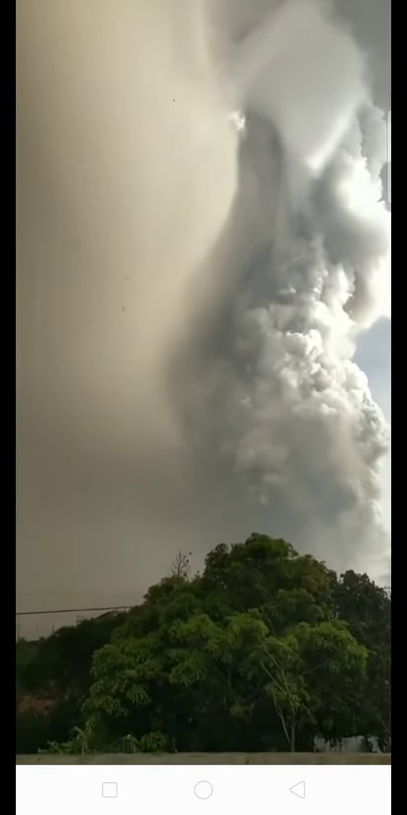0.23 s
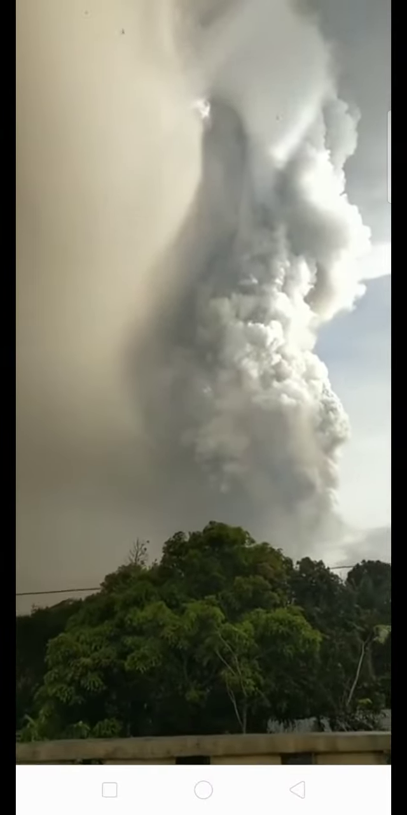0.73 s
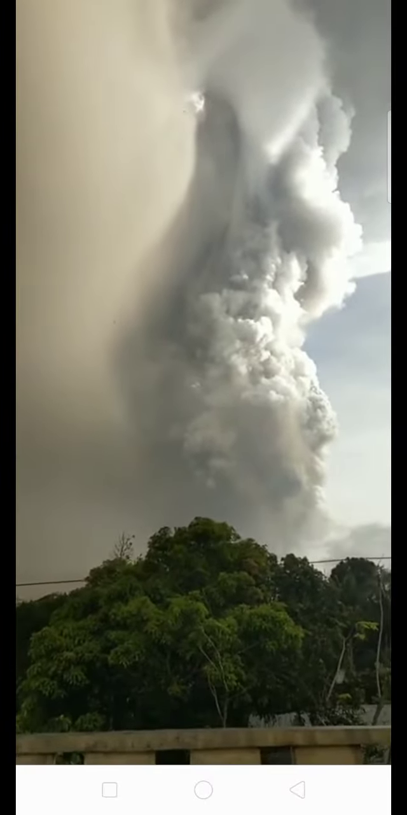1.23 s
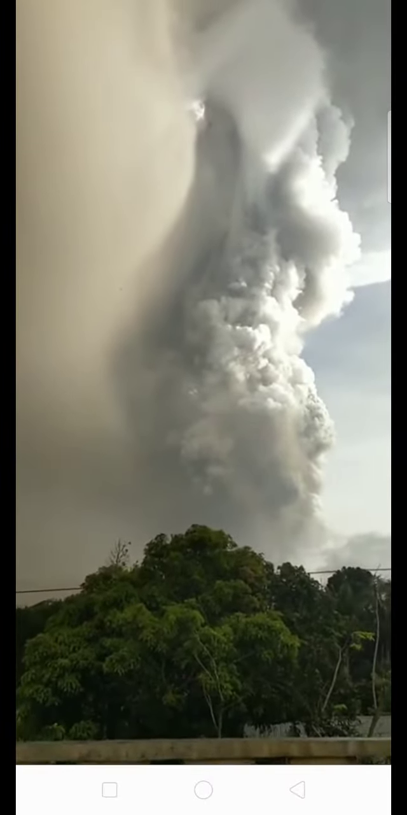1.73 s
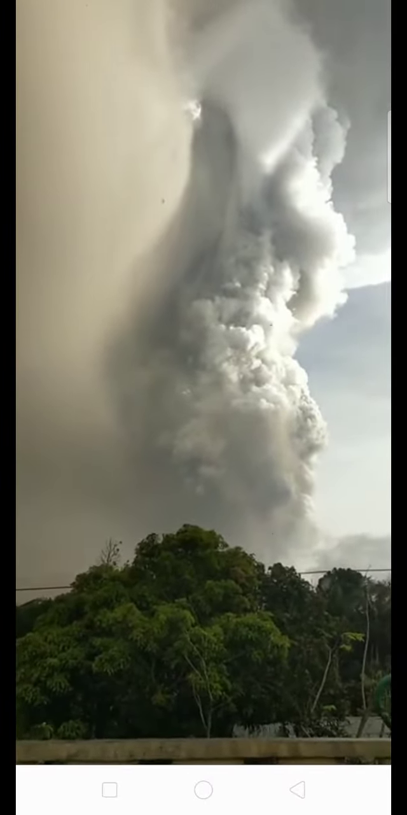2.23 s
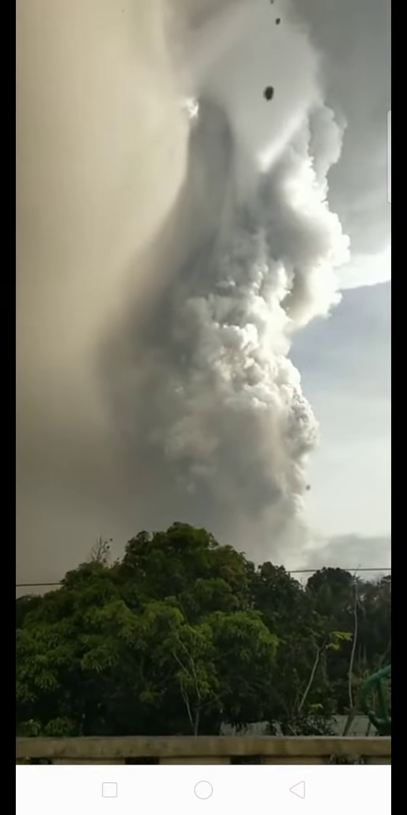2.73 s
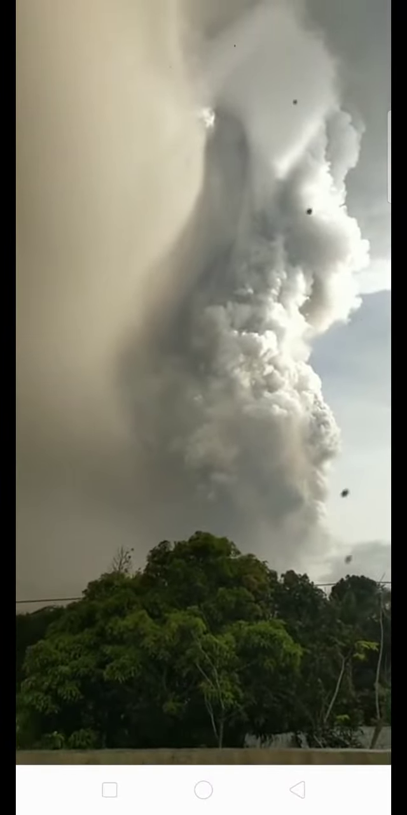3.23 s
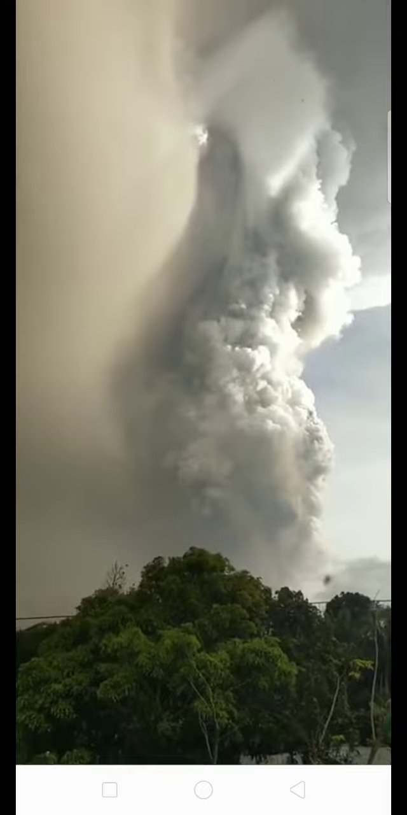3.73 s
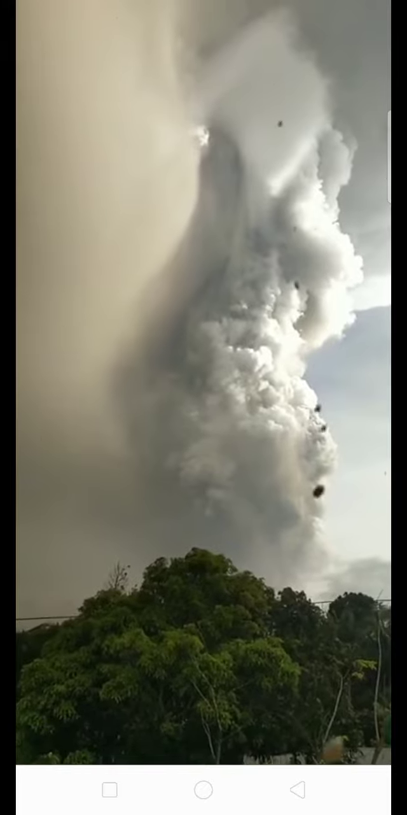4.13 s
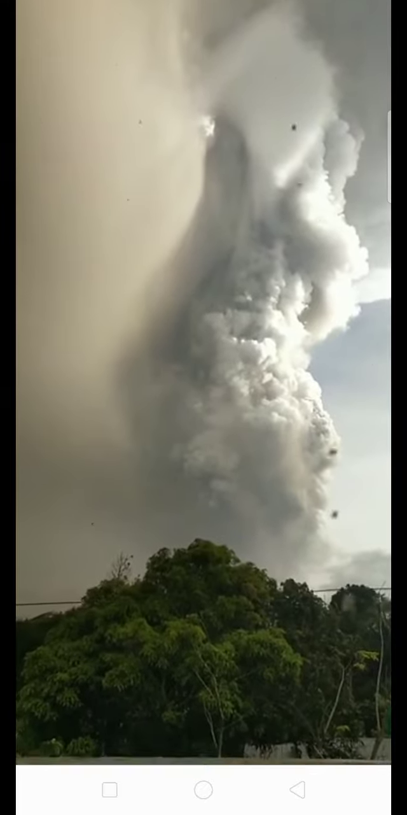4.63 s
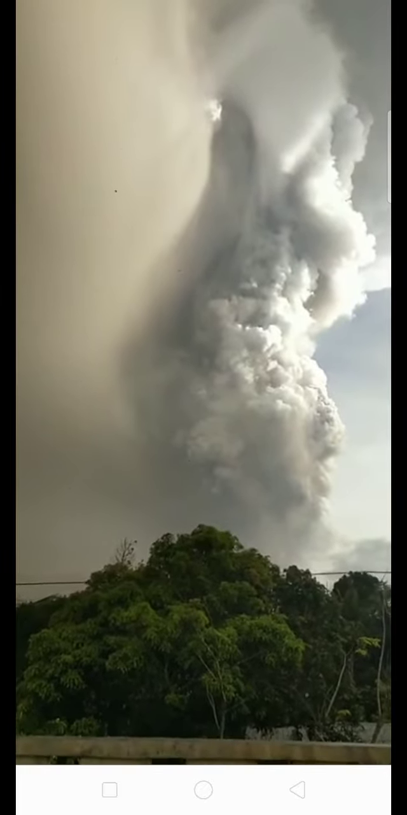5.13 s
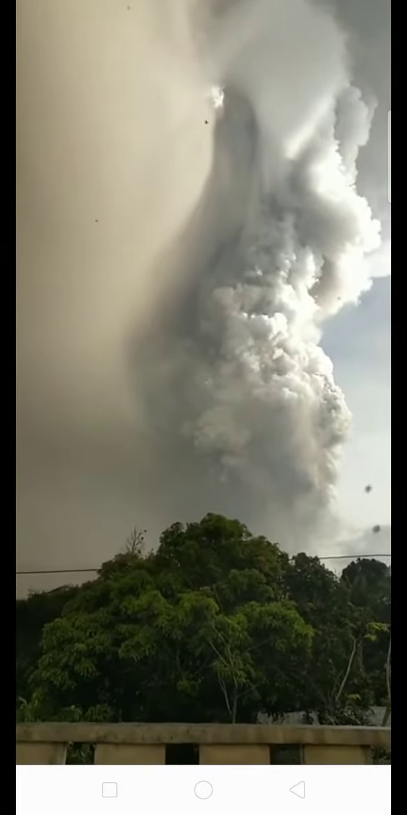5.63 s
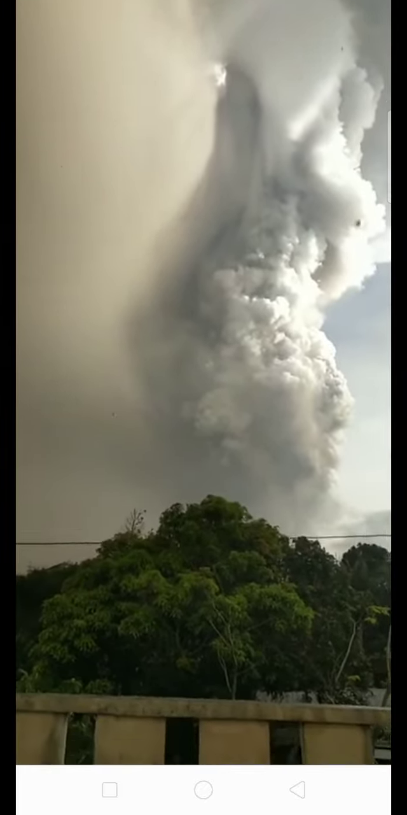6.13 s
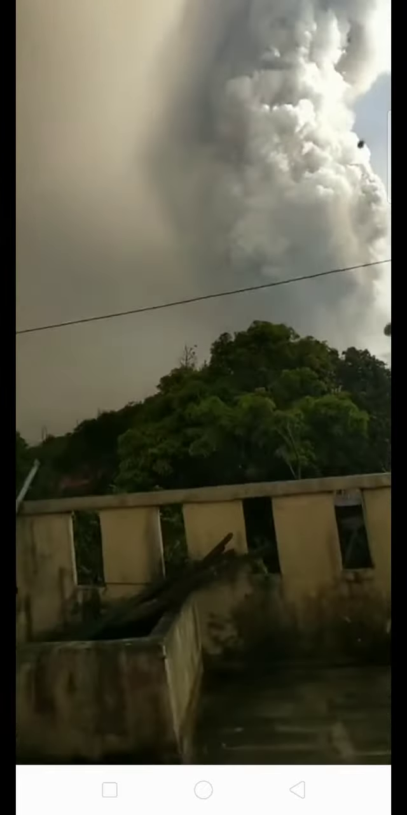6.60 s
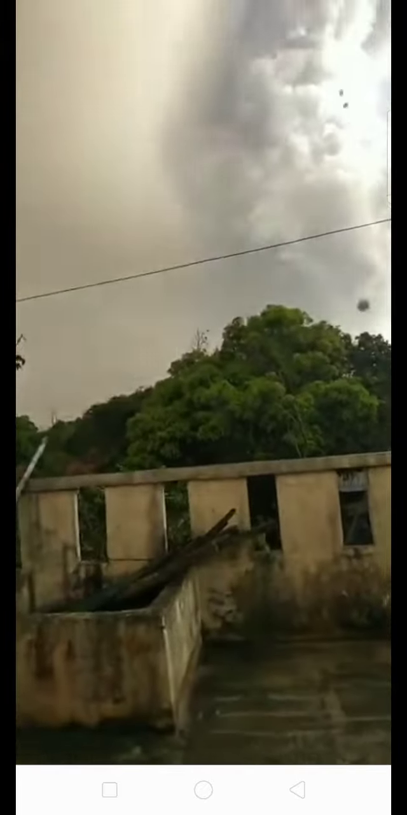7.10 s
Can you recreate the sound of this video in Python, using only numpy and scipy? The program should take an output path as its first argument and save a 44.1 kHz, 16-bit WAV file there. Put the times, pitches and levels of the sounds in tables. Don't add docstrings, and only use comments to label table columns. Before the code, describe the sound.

A dense, grainy hiss of wet volcanic grit falling on concrete and leaves runs throughout, made of countless tiny ticks, with brief thicker flurries. From 0 to 0.7 seconds several bright, close muddy drops snap down, with droplets scattering after them and duller splashes farther away. Spats continue around 1.0 to 1.7, including a low thud near 1.6. From 1.8 to 2.8 it is somewhat sparser, with a splash near 2.2; the fall then thickens around 3. The heaviest knock on the slab comes at about 3.6 with a sharp splash. A tight cluster of strong splashes and a thud hits at 4.4 to 4.5. Snappy drops follow at 5.2, 5.4, 5.6 and 5.8. The hiss thins around 6.5, with another thud, then grows denser from 7 with a crisp splash at 7.3. Faint low wind buffets beneath. The close phone pickup is boxy, mid-forward and dry, without deep bass.

```python
import sys
import numpy as np
from scipy import signal
from scipy.fft import rfft, irfft
from scipy.io import wavfile
from scipy.ndimage import uniform_filter1d, minimum_filter1d

SR = 44100
rng = np.random.default_rng(int(sys.argv[2]) if len(sys.argv) > 2 else 0)


def pcm_store(signal):
    levels = np.round(np.clip(np.atleast_2d(signal), -1, 1) * 32767)
    wavfile.write(sys.argv[1], SR, levels.astype(np.int16).T)


def to_linear_factor(level_db):
    exponent = np.asarray(level_db, float) / 20
    return 10 ** exponent


N = 324561
T = np.arange(N) / SR

# [t/s, level/dB]
STEADY_FALL = [(0.0, -27.5), (0.37, -28.5), (0.74, -26), (1.27, -26), (1.45, -27.5), (2.5, -28),
               (2.87, -24.5), (3.54, -24), (3.83, -27.5), (4.57, -24.5), (5.0, -27), (5.45, -25.5),
               (5.9, -26.5), (6.25, -26), (6.54, -29), (6.74, -28.5), (7.07, -25), (7.36, -24.5)]
# [middle t/s, peak level/dB, length/s, fine grit minus peak/dB]
FLURRIES = [(0.02, -28.5, 0.12, -19), (0.52, -28.5, 0.099, -14), (0.696, -31, 0.24, -12),
            (1.027, -31, 0.084, -10), (1.255, -34, .15, -16), (2.04, -43, 0.026, 0),
            (2.164, -26.5, 0.11, -15), (2.274, -29.5, 0.068, -15), (2.804, -29, 0.17, -10),
            (3.015, -29.5, .08, -10), (3.23, -30, .04, -16), (3.29, -28, 0.046, -6), (3.463, -29, .1, -10),
            (3.72, -28.5, .06, -16), (4.0, -31, 0.12, -8.5), (4.37, -30, 0.097, -20),
            (4.522, -28, .07, -15), (4.97, -26, 0.05, -17), (5.18, -30.5, 0.042, -16),
            (5.31, -26, 0.1, -10), (5.507, -26.5, 0.14, -16), (5.827, -32, 0.073, -7),
            (5.945, -37, 0.049, 0), (6.075, -28, 0.13, -11.5), (6.248, -25.5, 0.057, -20),
            (6.39, -42, .03, -8), (6.5, -31.5, 0.044, -7), (6.85, -33, .06, -13), (7.05, -29.5, 0.1, -11),
            (7.155, -29.5, 0.069, -9.5)]
# [t/s, bright peak level/dB, body minus bright/dB, air minus bright/dB, spray t60/s]
CLOSE_SPLASHES = [(0.0418, -15, -12.5, -39, 0.29), (0.1607, -14.5, 1.5, -39.5, 0.09),
                  (0.2394, -21, 5.5, -45, 0.29), (0.4914, -15.5, 0.5, -40, 0.11),
                  (0.6335, -20, 7.5, -44.5, 0.91), (0.9906, -17, -1, -41, 0.15),
                  (1.022, -21, 4, -41, 0.096), (1.093, -19, 15, -33.5, 0.44),
                  (1.3673, -14, 11.5, -41.5, 0.18), (1.68, -18, 13, -39, 0.16), (1.702, -20, 9.5, -40.5, 1),
                  (2.1645, -17, 8.5, -35, 0.7), (3.4216, -23, 12.5, -43, 1), (3.5533, -21, 8, -45, 0.063),
                  (3.581, -14, 2.5, -34, 0.49), (3.9694, -29, 9, -31.5, 0.16), (4.373, -15, -2, -37, 0.51),
                  (4.4767, -13.5, 5.5, -35, 0.63), (4.527, -14.5, 8.5, -35, 0.24),
                  (5.1517, -16, 0, -41, 0.082), (5.605, -17, 12, -42, 0.056),
                  (6.206, -23, 18.5, -38.5, 0.85), (6.4763, -18, 5.5, -40, 0.15),
                  (7.3108, -15, 6.5, -34, 0.41)]
# [t/s, bright peak level/dB, body minus bright/dB, spray t60/s]
FAR_SPLASHES = [(0.0209, -22.5, -8, .059), (0.5542, -21.5, -11, .068), (0.718, -28, 17, .073),
                (0.7946, -21, -12, 0.24), (1.416, -24, -11, .068), (1.534, -27.5, 14.5, .19),
                (1.5684, -27, 11.5, 0.99), (1.98, -30, 13, .083), (2.013, -27, -10, 0.28),
                (2.4392, -23, 1, .083), (2.4846, -30.5, 17.5, 0.34), (2.6494, -20.5, 7, .46),
                (2.759, -22, 0, .4), (2.982, -22.5, -6, .17), (3.009, -18.5, -4, 0.43),
                (3.3511, -22, 5, .059), (4.015, -25, -10, .29), (4.2712, -26.5, 1, .14),
                (4.3274, -21, 11.5, 0.54), (4.778, -22.5, 5.5, 0.23), (5.0005, -23.5, 15, 0.12),
                (5.2584, -20, 4, .39), (5.3213, -24, 1, .9), (5.443, -15, 6.5, 0.043),
                (5.7724, -15, 8.5, 0.054), (6.0287, -21, -6, 0.38), (6.5044, -22, -4, 0.14),
                (6.7461, -20.5, 8, 0.063), (7.017, -21, 5, 0.64), (7.1352, -23, -11.5, 0.32)]
# [middle t/s, peak level/dB, length/s]
DUST_PUFFS = [(0.163, -43, .012), (.5, -43, .02), (1.417, -51, .008), (2.037, -42.5, .03), (2.6, -46, .01),
              (3.022, -42, .012), (3.59, -41, .02), (5.158, -41, .012), (5.93, -44, .03),
              (6.39, -50, 0.027), (6.75, -46, .01)]
# [t/s, peak level/dB, pitch f/Hz, knock minus peak/dB]
HEAVY_DROPS = [(0.154, -32.5, 118, -4), (0.394, -46, 129, -1), (0.579, -42, 145, -7), (0.665, -45, 145, -4),
               (0.807, -44, 113, 1), (0.939, -44, 188, 3), (1.035, -36, 94.2, -6), (1.091, -34, 105, -3),
               (1.365, -46, 234, 6), (1.625, -33.5, 148, -10), (2.158, -36, 178, -2), (2.263, -46, 121, 7),
               (2.726, -44.5, 132, 10), (2.966, -44, 199, 1), (3.577, -25.5, 112, 8), (4.327, -35, 210, 0),
               (4.473, -31.5, 100, 3), (4.525, -41, 109, -7), (4.671, -37, 124, -10), (5.076, -45, 100, -5),
               (5.12, -40, 172, -3), (5.261, -47, 248, 7), (5.395, -44, 100, -5), (5.804, -41, 170, -6),
               (5.956, -49, 156, 4), (6.173, -39, 156, -4), (6.341, -49, 234, 1), (6.47, -32, 143, -2),
               (6.807, -40, 118, -2), (7.141, -47, 248, 0)]
# [t/s, level/dB]
WIND_LEVEL = [(0.0, -59), (0.5, -62), (1.15, -62.5), (1.45, -71), (2.45, -68), (3.14, -57), (3.3, -67.5),
              (4.15, -72.5), (4.35, -60), (4.53, -57), (4.7, -60), (4.88, -68.5), (5.6, -68.5), (5.82, -64),
              (6.1, -62.5), (6.5, -67), (6.85, -66), (7.3, -57.5)]
# [end t/s, depth/dB]
LULLS = [(.0209, -1.5), (.2394, -1.5), (1.093, -4), (1.679, 0), (2.1041, -2.5), (3.27, -2), (3.581, -3.5),
         (4.4767, 1.5), (5.607, -8), (6.206, -3), (6.91, -3), (7.3108, -2.5)]
# [f/Hz, level/dB per Hz]
LOW_TONE = [(12, -66.5), (20, -16.5), (102, -17), (227, -18), (592, -7.5), (748, -13.5), (1100, 8),
            (1430, -30), (2420, -120)]
# [f/Hz, level/dB per Hz]
BODY_TONE = [(380, -59), (650, -16), (756, -35), (1080, -9.5), (1510, -11), (1990, -2.5), (2240, 1),
             (2810, -4), (4200, -23), (4450, -35), (4800, -29), (6240, -43), (10600, -120)]
# [f/Hz, level/dB per Hz]
BRIGHT_TONE = [(2600, -43), (3700, -6.5), (4340, -10.5), (5150, -0.5), (6070, 0), (7030, -6.5), (7650, -16),
               (8350, -14), (9120, -25.5), (9500, -36.5), (9850, -43.5), (11000, -82)]
# [f/Hz, level/dB per Hz]
AIR_TONE = [(9000, -20), (9800, -5), (10400, -2), (10900, -3), (11400, 1.5), (12000, -4), (12800, -4),
            (13400, -.5), (14300, -8), (15000, -10), (15700, -8), (16500, -40)]
# [f/Hz, level/dB per Hz]
KNOCK_TONE = [(100, -12.5), (250, -3.5), (400, -1), (520, 1), (700, -4), (1000, -8), (1500, -20),
              (2500, -38)]

BRIGHT_REL_DB, LOW_REL_DB = -11.5, -19.5
FAR_AIR_REL_DB = -45.5
SLAB_T60_S = 0.027


def rain():
    fall = to_linear_factor(2 * (np.interp(T, *np.transpose(STEADY_FALL)) - 0.89))
    sheet, fine_sheet = flurries()
    _, peak_db, body_rel, air_rel, _ = drops()
    grit = grains(2500, 2.85, 11, 0.23)
    gust_db = 0.8 * walk(12) + lull_db(0.024)

    wet = spray(peak_db + body_rel - 15.5, 1.0, 0.00086, 0.83)
    body_power = (fall + sheet) * to_linear_factor(2 * (gust_db + 0.76 * walk(20))) + wet
    hiss = fall * to_linear_factor(2 * BRIGHT_REL_DB) + fine_sheet
    bright_spray = spray(peak_db - 11.5, 0.72, 0.0007, 0.44)
    bright_power = hiss * to_linear_factor(2 * (gust_db + 0.96 * walk(25))) + bright_spray
    mist_power = hiss * to_linear_factor(2 * (gust_db - 38.0)) + spray(peak_db + air_rel - 11, 0.92, 0.0008, 0.4)
    mist_level = np.sqrt(mist_power) * to_linear_factor(2.0 * walk(28))
    air_power = spray(peak_db + air_rel - 13.5, 0.25, 0.0005, 6.5)
    low_flicker_db = 0.4 * gust_db + 0.91 * walk(13)
    low_level = np.sqrt(fall + 0.53 * sheet + 0.11 * wet) * to_linear_factor(LOW_REL_DB - 2.0 + low_flicker_db)

    specks = grains(500, 3.5, 14, 0.28)
    body_hits = np.sqrt(body_power) * grit + strikes(peak_db + body_rel + 5)
    bright_hits = np.sqrt(bright_power) * grit + strikes(peak_db + 6)
    air_hits = np.sqrt(air_power) * specks + strikes(peak_db + 1.24 * air_rel + 25.5)

    mist = colour(mist_level * specks, AIR_TONE[:9], 9000, 15500, (10000, 15000))
    low = colour(low_level * grit, LOW_TONE, 288, 785, (300, 1000))
    body = colour(body_hits, BODY_TONE, 760, 4380, (1500, 3500))
    bright = colour(bright_hits, BRIGHT_TONE, 4270, 11000, (4500, 9000))
    air = colour(air_hits, AIR_TONE, 8000, 16000, (10000, 15000))
    return mist + dust(specks) + low + body + bright + air


def grains(rate_hz, spread_db, top_db, share):
    chance = rng.random((3, N))
    size_db = np.minimum(-spread_db * np.log(1 - chance[2]), top_db)
    sign = np.sign(chance[1] - 0.5)
    hits = (chance[0] < rate_hz / SR) * sign * to_linear_factor(size_db)
    share = np.clip(share, 0, 1)
    return np.sqrt(share) * hits / hits.std() + np.sqrt(1 - share) * rng.standard_normal(N)


def flurries():
    s, db, length_s, fine_db = np.transpose(FLURRIES)[:, :, None]
    swell = to_linear_factor(2 * db) * np.exp(-(2 * (T - s) / length_s) ** 2)
    return swell.sum(axis=0), (swell * to_linear_factor(2 * fine_db)).sum(axis=0)


def drops():
    far = [(s, db, body, FAR_AIR_REL_DB, t60) for s, db, body, t60 in FAR_SPLASHES]
    return np.transpose(list(CLOSE_SPLASHES) + far)


def strikes(peak_db):
    clicks = np.zeros(N)
    clicks[(drops()[0] * SR).astype(int)] = to_linear_factor(peak_db)
    return clicks + 0.8 * np.roll(clicks, shift=215)


def spray(peak_db, slow, rise_s, crack):
    power = np.zeros(N)
    starts, *_, t60s = drops()
    for s, t60, db in zip(starts, t60s, peak_db):
        after = slice(int(s * SR), int(s * SR) + SR // 2)
        t = np.maximum(T[after] - s, 0)
        droplets = np.exp(-2 * np.log(1000) * t / (slow * np.clip(t60, 0.03, 0.9)))
        burst = droplets + crack * np.exp(-t / 0.0045)
        power[after] += to_linear_factor(2 * db) * (1 - np.exp(-t / rise_s)) * burst
    return power


def dust(specks):
    puffs = sum(to_linear_factor(db) * np.exp(-(2 * (T - s) / length_s) ** 2) for s, db, length_s in DUST_PUFFS)
    return colour(puffs * specks, BRIGHT_TONE, 7000, 9600, (7000, 9500))


def thuds():
    push, knock, tap = np.zeros((3, N))
    for s, db, hz, knock_db in HEAVY_DROPS:
        t = np.clip(T - s - 0.006, 0, 1)
        fade = np.log(1000) * t / SLAB_T60_S
        swing = np.sin(2 * np.pi * hz * t) * np.exp(-fade)
        push += to_linear_factor(db + 2.5) * swing * (1 - np.exp(-t / 0.0011))
        knock += to_linear_factor(db + knock_db - 9.5) * (t > 0) * np.exp(-1.6 * fade)
        tap[int((s + 0.005) * SR)] += to_linear_factor(db + knock_db + 15)
    return push + colour(tap + knock * rng.standard_normal(N), KNOCK_TONE, 120, 1600, (350, 900))


def wind():
    puffs = to_linear_factor(np.interp(T, *np.transpose(WIND_LEVEL)) + 4.0 + 2.0 * walk(11))
    return colour(puffs * grains(50, 4.0, 8.1, 0.65), LOW_TONE, 25, 265, (40, 250))


def lull_db(lead_s):
    return sum(np.minimum(db, 0) * (T < s) * np.exp(-((T - s) / lead_s) ** 2) for s, db in LULLS)


def walk(rate_hz):
    k = int(SR / rate_hz)
    held = np.repeat(rng.standard_normal(N // k + 1), k)
    return 1.3 * uniform_filter1d(uniform_filter1d(held, k), k)[:N]


def colour(x, table, lo_hz, hi_hz, unit_hz):
    f = np.arange(1, 4098) * SR / 8194
    hz, db = np.transpose(table)
    gain = to_linear_factor(np.interp(np.log(f), np.log(hz), db, left=-150, right=-150))
    gain = gain / np.sqrt((1 + (lo_hz / f) ** 16) * (1 + (f / hi_hz) ** 16))
    inside = (f > unit_hz[0]) & (f < unit_hz[1])
    return causal(x, gain / np.sqrt(np.sum(gain[inside] ** 2) / len(f)))


def causal(x, gain):
    c = irfft(np.log(gain + 1e-7))
    c[1:len(c) // 2] *= 2
    c[len(c) // 2 + 1:] = 0
    ringing = irfft(np.exp(rfft(c)))[:2048]
    return signal.fftconvolve(x, ringing)[:N]


def scene():
    return (rain() + wind() + thuds())[None]


def roll_off(x):
    return signal.sosfilt(signal.butter(12, 15800, fs=SR, output="sos"), x)


def record(dry):
    thin = signal.sosfilt(signal.butter(3, 70, "high", fs=SR, output="sos"), dry)
    room = np.minimum(1, 0.3 / (np.abs(thin) + 1e-9))
    room = minimum_filter1d(room, size=161)
    held = thin * uniform_filter1d(uniform_filter1d(room, size=81), size=81)
    return roll_off(held)


dry = scene()
out = record(dry)
pcm_store(out)
```